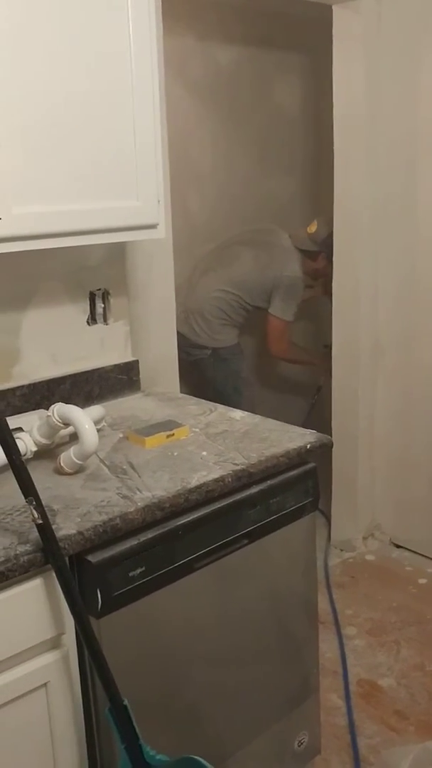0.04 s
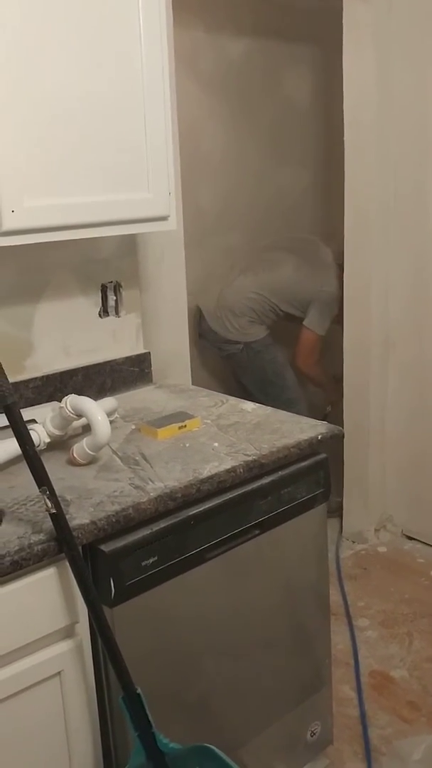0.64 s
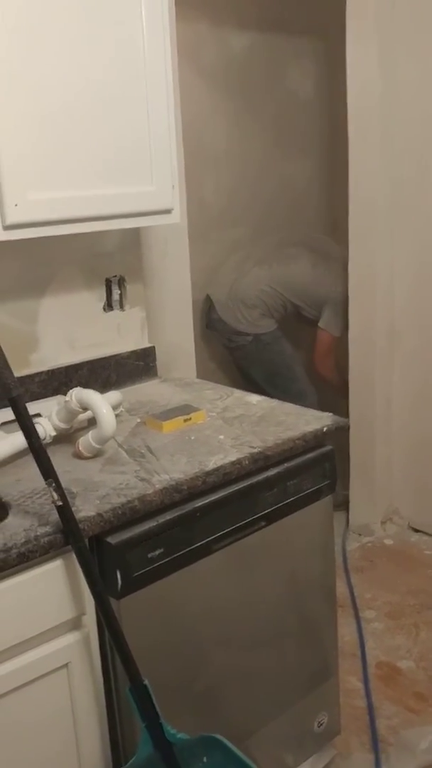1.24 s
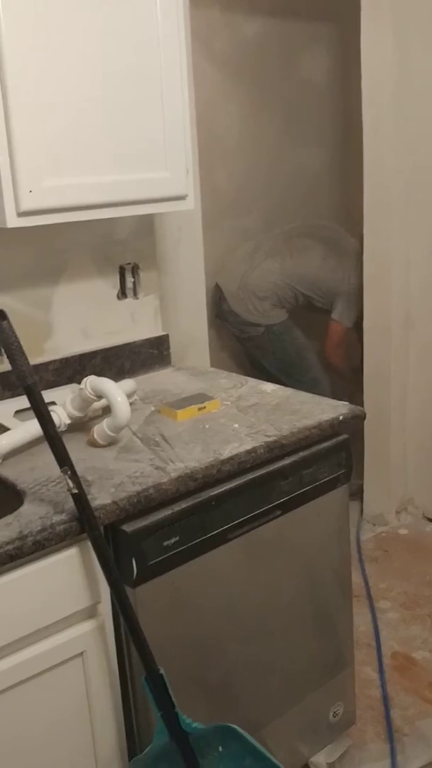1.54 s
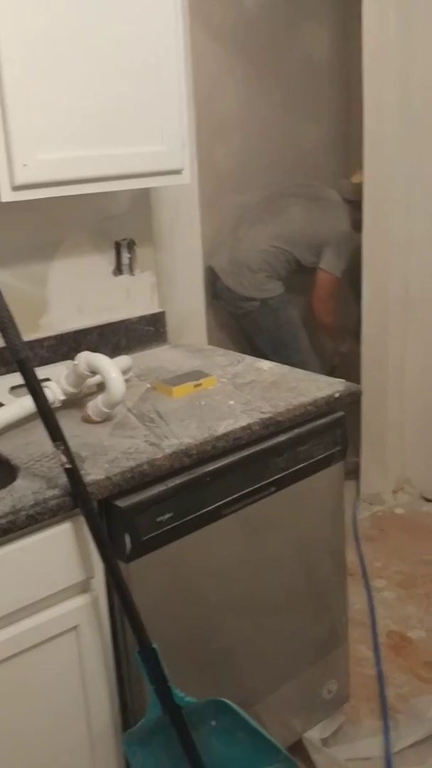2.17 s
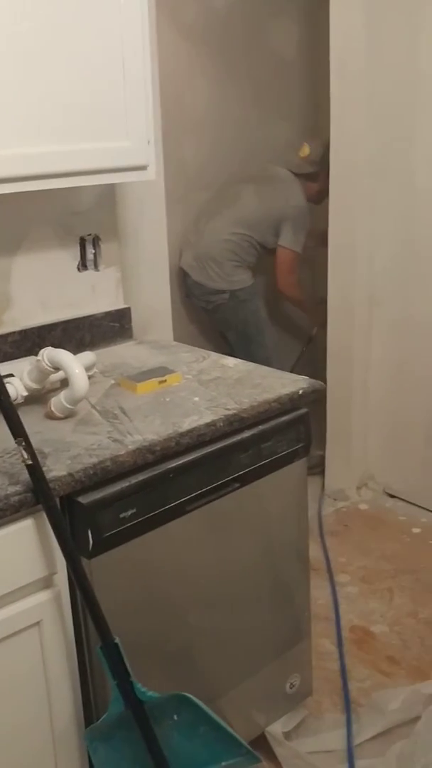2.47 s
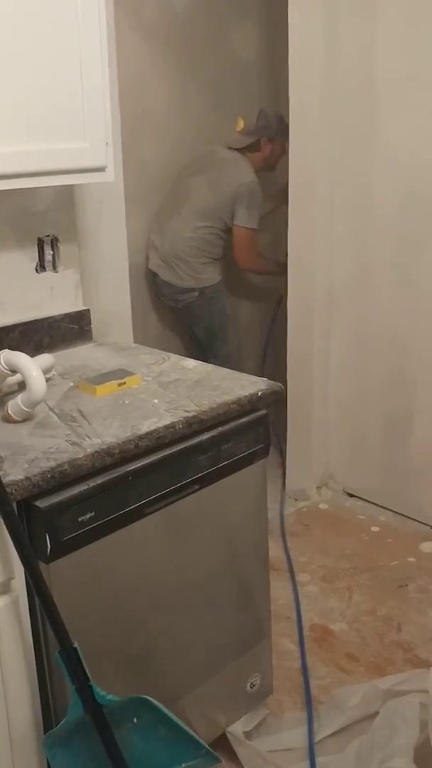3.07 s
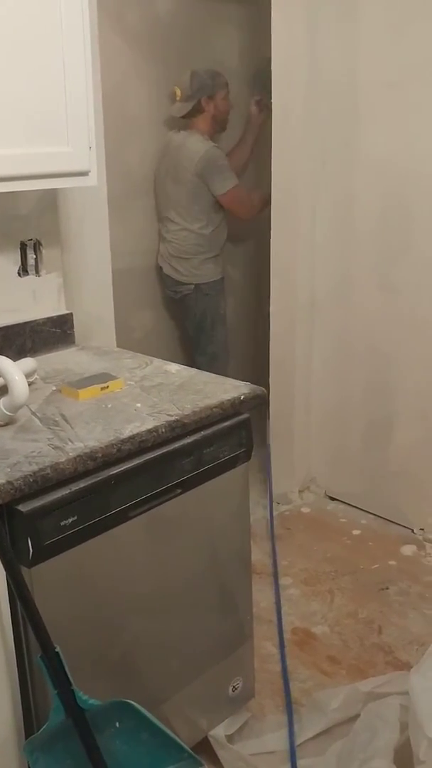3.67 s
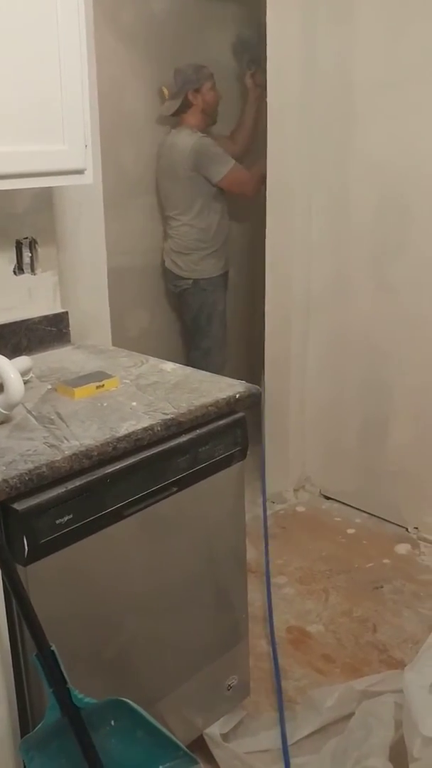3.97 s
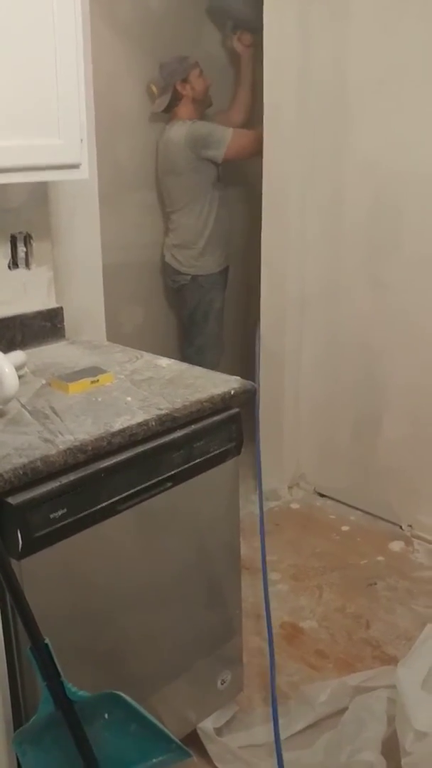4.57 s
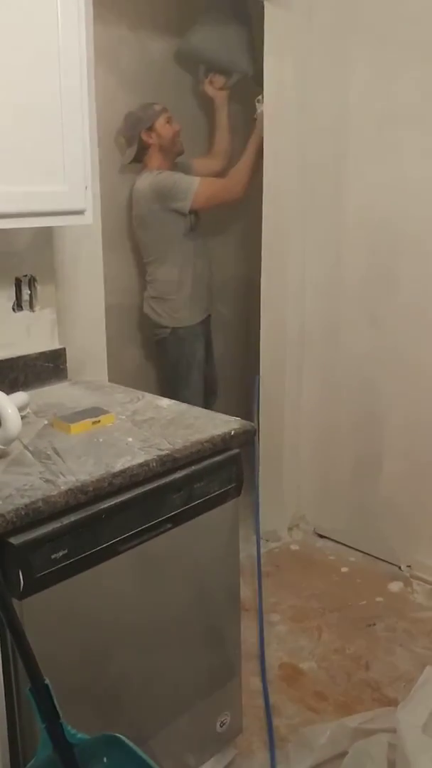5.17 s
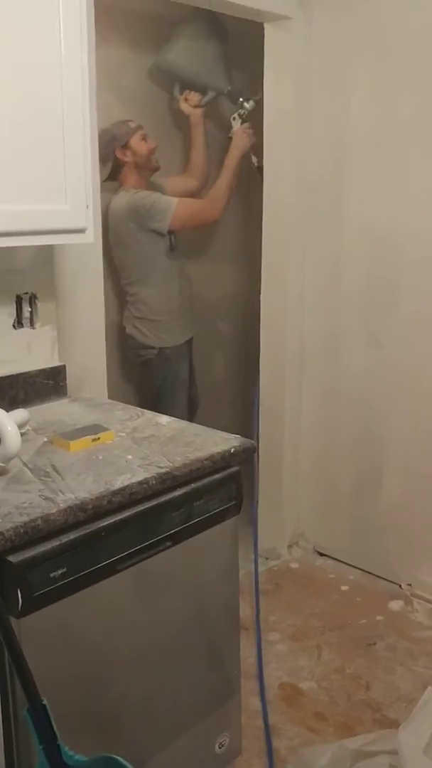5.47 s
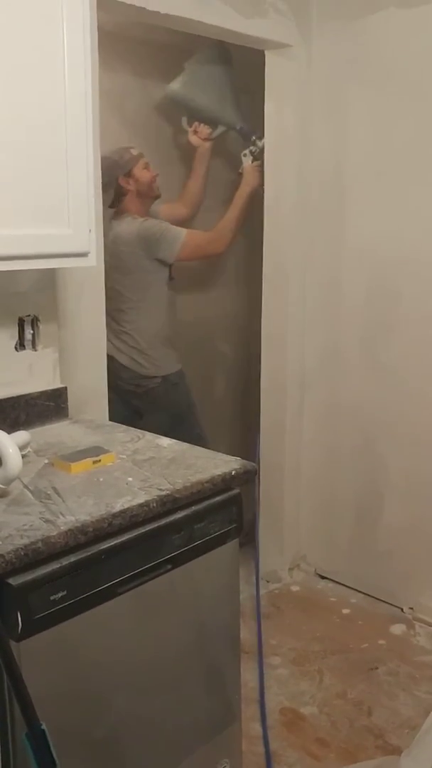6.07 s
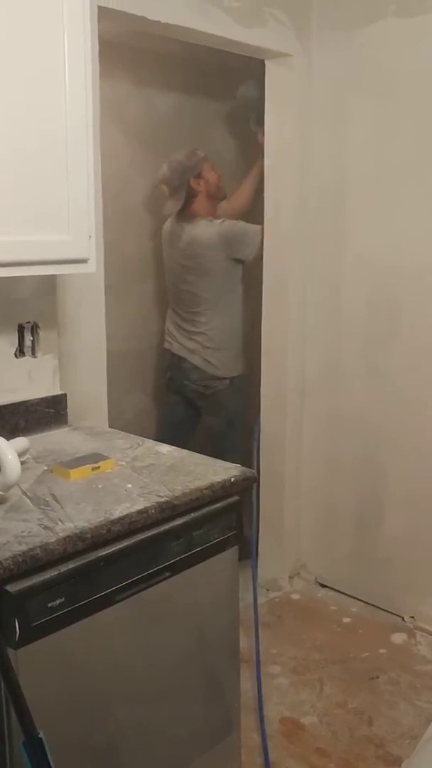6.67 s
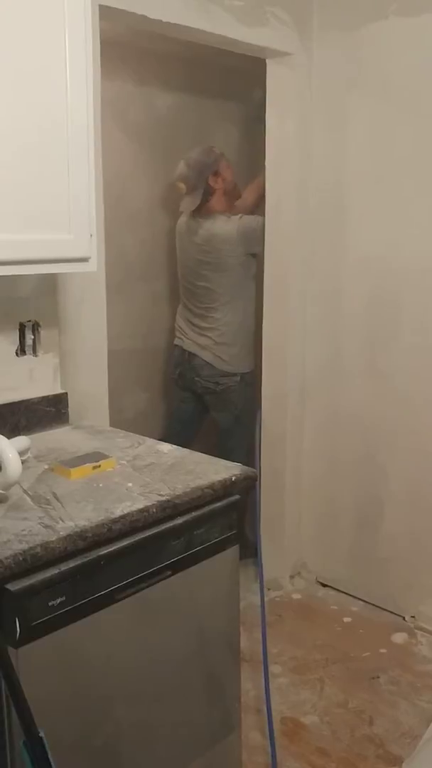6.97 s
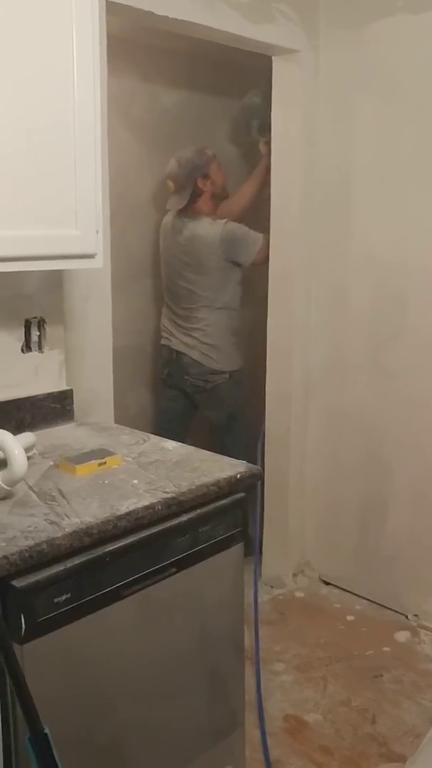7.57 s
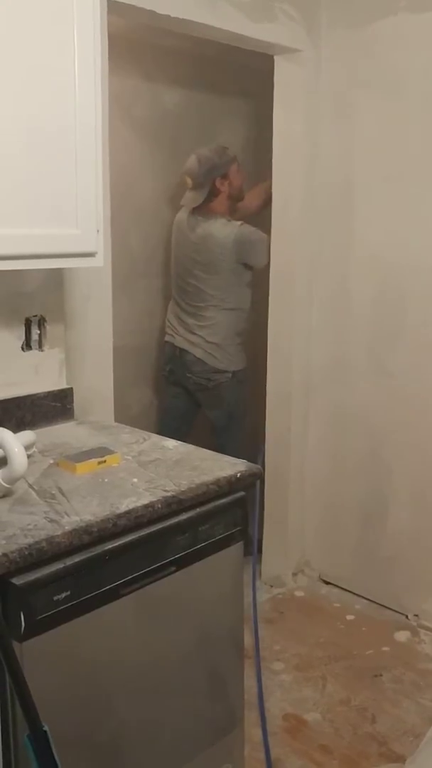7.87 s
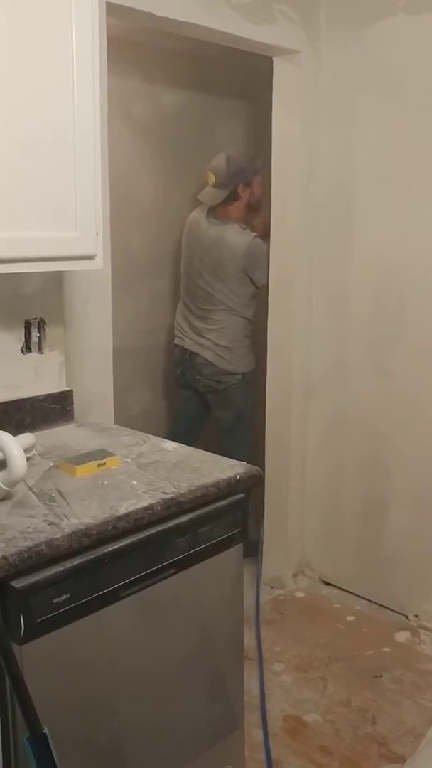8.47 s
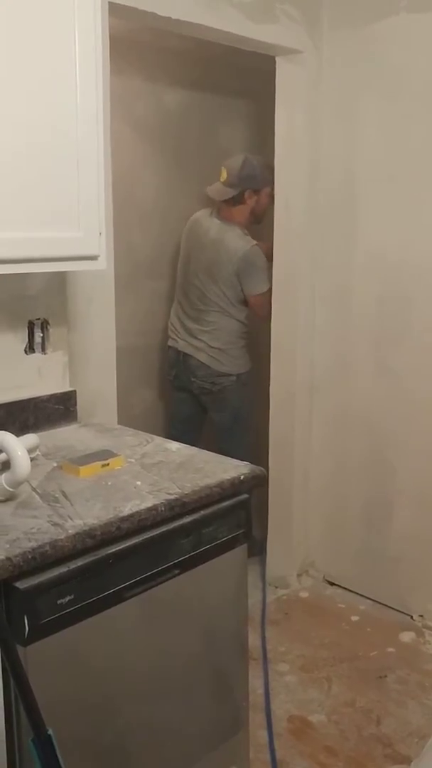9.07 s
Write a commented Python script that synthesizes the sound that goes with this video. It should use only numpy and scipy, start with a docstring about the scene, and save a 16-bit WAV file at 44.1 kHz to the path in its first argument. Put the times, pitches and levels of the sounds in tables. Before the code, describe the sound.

A hopper spray gun blows wall texture in a small bare room, and its loud compressed air hiss runs without a break for the whole nine seconds or so. The hiss is bright, wide and nearly constant in level, with a slightly wavering rush below it and a wet, swirling flicker in the treble. It overloads the microphone a little.

Underneath, air buffets the microphone, making a fluttering rumble and short, hollow low pops, almost all on the left. These come in irregular clumps from the start until about 4.8 seconds, ease briefly, then crowd together most strongly from 5.4 to 6.3 seconds. The sputter then drops back, with one hard pop near 6.6 seconds and a few scattered ones after it. From about 7.5 seconds the pops grow more frequent again, continuing under the unchanged hiss to the end.

```python
"""Hopper gun in a bare alcove

A hopper gun blows wall texture into a small bare alcove, its air jet hissing without a break.
The hiss arrives from all the walls at once, rings in two microphone ports and overloads the recorder.
Under the blast the microphones sputter with low pops, mostly the left one, and most of all while
the gun is in the open. A flicker in the treble gives the hiss a wet, swirling edge."""
import sys
import numpy as np
from scipy import signal
from scipy.fft import rfft, irfft, next_fast_len
from scipy.io import wavfile
from scipy.ndimage import uniform_filter1d

SR = 44100
rng = np.random.default_rng(int(sys.argv[2]) if len(sys.argv) > 2 else 0)


def transcribe(u):
    """Save the signal u as a 16-bit wav file named by the first command-line argument.

    u: samples, shape (n,) or (channels, n), limited to [-1, 1]; the rate is SR.
    q: integer samples, one column per channel.
    """
    v = np.clip(np.atleast_2d(u).T, -1, 1)
    q = np.round(v * 32767).astype(np.int16)
    wavfile.write(sys.argv[1], SR, q)


N = 411894

# The hardest kicks of air on the microphones.
# Each row: start in seconds, relative peak level in dB, microphone (0 left, 1 right).
LOUD_POPS = [(0.151, -8.5, 0), (0.17, -9.0, 0), (0.239, -10.0, 0), (0.287, -11.0, 0), (0.317, -9.5, 0),
             (0.325, -8.0, 0), (0.335, -11.0, 0), (0.373, -11.0, 0), (0.389, -5.0, 0), (0.393, -6.5, 0),
             (0.413, -8.5, 0), (0.429, -4.0, 0), (0.449, -11.0, 0), (0.462, -6.5, 0), (0.469, -9.5, 0),
             (0.59, -10.5, 0), (0.6, -4.5, 0), (0.62, -8.5, 0), (0.652, -11.5, 0), (0.659, -11.0, 0),
             (0.714, -6.0, 0), (0.723, -4.5, 0), (0.733, -8.0, 0), (0.759, -7.0, 0), (0.767, -6.0, 0),
             (0.779, -8.5, 0), (0.789, -10.5, 0), (0.83, -11.0, 0), (0.845, -9.5, 0), (0.854, -10.0, 0),
             (0.886, -5.0, 0), (0.891, -10.0, 0), (0.898, -11.5, 0), (0.926, -9.5, 0), (0.979, -3.5, 0),
             (0.998, -11.5, 0), (1.013, -11.5, 0), (1.059, -10.0, 0), (1.143, -6.5, 0), (1.192, -6.5, 0),
             (1.246, -7.0, 0), (1.261, -2.5, 0), (1.329, -10.0, 0), (1.346, -9.0, 0), (1.381, -11.0, 0),
             (1.396, -5.0, 0), (1.417, -7.0, 0), (1.499, -10.0, 0), (1.521, -4.5, 0), (1.587, -10.5, 0),
             (1.64, -3.5, 0), (1.656, -7.5, 0), (1.71, -10.0, 0), (1.777, -8.0, 0), (1.838, -10.0, 0),
             (1.869, -8.0, 0), (1.97, -11.0, 0), (2.026, -8.5, 0), (2.064, -10.0, 0), (2.086, -8.0, 0),
             (2.263, -11.0, 0), (2.281, -10.0, 0), (2.375, -6.5, 0), (2.438, -11.0, 0), (2.445, -9.0, 0),
             (2.459, -6.5, 0), (2.485, -9.5, 0), (2.547, -10.0, 0), (2.561, -9.0, 0), (2.577, -4.0, 0),
             (2.694, -6.5, 0), (2.798, -10.0, 0), (2.831, -7.0, 0), (2.98, -6.0, 0), (3.182, -8.5, 0),
             (3.189, -10.0, 0), (3.28, -9.5, 0), (3.378, -5.5, 0), (3.389, -11.5, 0), (3.452, -9.0, 0),
             (3.463, -7.0, 0), (3.471, -11.0, 0), (3.489, -5.5, 0), (3.532, -11.0, 0), (3.58, -5.0, 0),
             (3.651, -5.0, 0), (3.676, -10.5, 0), (3.74, -7.0, 0), (3.781, -9.0, 0), (3.815, -8.0, 0),
             (3.847, -4.5, 0), (3.875, -11.5, 0), (3.992, -6.5, 0), (3.999, -9.0, 0), (4.031, -9.0, 0),
             (4.04, -4.5, 0), (4.044, -9.5, 0), (4.051, -6.0, 0), (4.056, -10.5, 0), (4.175, -9.0, 0),
             (4.187, -5.5, 0), (4.204, -3.5, 0), (4.21, -7.0, 0), (4.267, -10.5, 0), (4.286, -6.5, 0),
             (4.304, -8.5, 0), (4.345, -10.0, 0), (4.365, -6.0, 0), (4.417, -7.0, 0), (4.498, -10.5, 0),
             (4.531, -11.5, 0), (4.536, -10.5, 0), (4.544, -11.5, 0), (4.608, -9.0, 0), (4.618, -9.0, 0),
             (4.679, -10.5, 0), (4.843, -3.0, 0), (4.929, -8.5, 0), (5.062, -11.5, 0), (5.219, -7.0, 0),
             (5.243, -11.5, 0), (5.279, -11.0, 0), (5.415, -9.5, 0), (5.426, -7.0, 0), (5.438, -9.0, 0),
             (5.445, -11.5, 0), (5.446, -12.0, 1), (5.454, -8.0, 0), (5.475, -10.0, 1), (5.477, -10.5, 0),
             (5.485, -10.5, 0), (5.492, -10.0, 0), (5.5, -12.0, 1), (5.503, -3.5, 0), (5.51, -4.0, 0),
             (5.549, -5.0, 0), (5.561, -5.0, 0), (5.572, -10.0, 0), (5.602, -10.0, 0), (5.607, -6.5, 0),
             (5.623, -9.5, 0), (5.634, -7.5, 0), (5.64, -4.5, 0), (5.647, -8.5, 0), (5.68, -10.5, 0),
             (5.687, -4.0, 0), (5.701, -3.5, 0), (5.705, -8.0, 0), (5.71, -10.0, 0), (5.718, -12.0, 1),
             (5.721, -10.5, 0), (5.729, -6.0, 0), (5.79, -6.5, 0), (5.795, -9.0, 0), (5.822, -6.0, 0),
             (5.835, -8.0, 0), (5.839, -9.0, 0), (5.855, -9.0, 0), (5.936, -10.0, 0), (5.947, -9.5, 0),
             (5.956, -4.5, 0), (5.976, -7.5, 0), (5.98, -11.5, 0), (6.075, -7.0, 0), (6.089, -3.0, 0),
             (6.149, -11.5, 0), (6.155, -6.0, 0), (6.171, -10.0, 0), (6.184, -9.5, 0), (6.238, -8.0, 0),
             (6.245, -6.0, 0), (6.627, -3.0, 0), (7.063, -10.0, 0), (7.239, -7.0, 0), (7.406, -11.0, 0),
             (7.503, -9.0, 0), (7.526, -9.5, 0), (7.697, -7.5, 0), (7.792, -11.5, 0), (7.817, -9.5, 0),
             (7.842, -7.5, 0), (7.933, -9.5, 0), (7.945, -11.5, 0), (7.963, -7.5, 0), (7.968, -9.0, 0),
             (7.984, -9.5, 0), (8.05, -10.0, 0), (8.086, -7.0, 0), (8.167, -8.0, 0), (8.173, -8.0, 0),
             (8.191, -10.0, 0), (8.203, -9.5, 0), (8.233, -10.0, 1), (8.233, -8.5, 0), (8.351, -11.5, 0),
             (8.355, -9.5, 0), (8.574, -10.0, 0), (8.608, -7.5, 0), (8.632, -9.0, 0), (8.637, -6.5, 0),
             (8.661, -10.0, 0), (8.728, -5.0, 0), (8.776, -6.5, 0), (8.801, -8.5, 0), (8.879, -9.5, 0),
             (8.895, -11.0, 0), (9.018, -9.0, 0), (9.106, -10.0, 0), (9.158, -9.5, 0)]


def from_db(db):
    """Decibels to gain."""
    return 10 ** (np.asarray(db) / 20)


def unit_rms(x):
    """Scale to an rms of one."""
    return x / np.sqrt(np.mean(x ** 2) + 1e-20)


def envelopes(rows):
    """Draw each column after the first (seconds) as a curve over every sample."""
    seconds, *columns = np.transpose(rows)
    return [np.interp(np.arange(N) / SR, seconds, column) for column in columns]


def drift(per_s):
    """Smooth random modulation with an rms of one and per_s turning points a second."""
    knots = rng.standard_normal(4000)
    return unit_rms(np.interp(np.arange(N) / SR * per_s, np.arange(len(knots)), knots))


def two_pole(x, hz, q, kind):
    """A resonant low-, band- or high-pass."""
    w = 2 * np.pi * hz
    numerator = {"low": [w * w], "band": [w / q, 0], "high": [1, 0, 0]}[kind]
    return signal.lfilter(*signal.bilinear(numerator, [1, w / q, w * w], SR), x + 1e-18)


def air_jet(port):
    """Turbulent hiss coloured by one port; the bare walls scatter it, so each port gets its own noise."""
    # The nearly steady blast. Each row: time in seconds, relative levels of hiss and lower rush in dB.
    jet_levels = [(0.15, -11, -9.5), (1.44, -11.5, -9.5), (5.0, -11.5, -10.5), (6.6, -12, -10.5),
                  (8.54, -11.5, -12), (9.3, -12, -10.5)]
    # The tone of the jet in the room. Each row: frequency in Hz, relative level in dB.
    jet_tone = [(20, -24), (55, -13), (150, -15.5), (350, -14.5), (800, -7.5), (1400, -13), (2200, -8),
                (3200, -4.5), (5000, 0.04), (7000, 4.5), (10000, 0), (16000, 0)]
    hiss_db, rush_db = envelopes(jet_levels)
    tone_hz, tone_db = np.transpose(jet_tone)
    size = next_fast_len(N, real=True)
    hz = np.arange(size // 2 + 1) * SR / size
    colour_db = np.interp(np.log(hz + 1), np.log(tone_hz), tone_db)
    for centre, width, db in port:
        colour_db += db / (1 + (2 * (hz - centre) / width) ** 2)
    spectrum = rfft(rng.standard_normal(size)) * from_db(colour_db)
    hiss = irfft(spectrum, size)[:N]
    # The lower rush wavers and the top flutters slightly, each on its own.
    rush_band = np.exp(-np.log2((hz + 1) / 2930) ** 2)  # an octave either side of 2930 Hz
    top_band = np.clip((hz - 8000) / 3000, 0, 1)
    rush = irfft(spectrum * rush_band, size)[:N]
    top = irfft(spectrum * top_band, size)[:N]
    waver = from_db(rush_db - np.mean(rush_db) + 1.6 * np.tanh(drift(per_s=22)))
    flutter = from_db(0.5 * drift(per_s=45))
    return from_db(hiss_db) * (hiss + (waver - 1) * rush + (flutter - 1) * top) / np.std(hiss)


def microphone_pop(kicks, tuning=1):
    """A kick of air gives a short rounded spike, a hollow ring and a slow swing through the bass cut."""
    spike = two_pole(kicks, hz=895 * tuning, q=0.99, kind="low")
    spike = two_pole(spike, hz=1800, q=0.53, kind="low")
    hollow = two_pole(spike, hz=549 * tuning, q=6.0, kind="band")
    thump = two_pole(spike, hz=82.6, q=0.73, kind="band")
    pop = two_pole(spike + 1.76 * hollow + 2.0 * thump, hz=54.5, q=1.95, kind="high")
    return two_pole(pop, hz=27, q=1.0, kind="high")


def sputter_strength():
    """How hard the blast buffets the microphones, with a brief flurry around each loud pop."""
    # The sputter as the gun moves about; it is in the open from 5.4 to 6.3 seconds.
    # Each row: time in seconds, relative level in dB.
    buffeting = [(0, -23), (0.45, -26), (0.8, -24.5), (1.07, -32.5), (1.45, -23.5), (2.05, -26.5),
                 (2.6, -26.5), (3.1, -30.5), (3.45, -28), (4.05, -24.5), (4.55, -25.5), (4.75, -26.5),
                 (5.05, -34), (5.37, -30), (5.46, -22.5), (5.8, -25), (6.03, -26.5), (6.23, -24.5),
                 (6.33, -36.5), (6.9, -33.5), (7.55, -31), (7.97, -30.5), (8.47, -30), (8.78, -29),
                 (9.0, -27), (9.3, -32)]
    level_db, = envelopes(buffeting)
    flurry_db, flurry_half_s = -23.5, 0.015
    peaks = np.zeros(N)
    for start, db, _ in LOUD_POPS:
        peaks[int(start * SR)] += from_db(db + flurry_db)
    flurries = signal.fftconvolve(peaks, np.bartlett(2 * int(flurry_half_s * SR) + 1), "same")
    return np.hypot(from_db(level_db), flurries)


def sputter(strength, per_s, spread_db):
    """Small kicks of uneven size come in loose clumps and merge into a fluttering rumble."""
    clumps = from_db(2.5 * np.tanh(2 * drift(per_s=30)))
    density = (strength / np.mean(strength)) ** 0.6  # harder sputter is also denser
    hits = rng.random(N) < per_s * density * clumps / SR
    sizes = clumps / np.sqrt(density) * from_db(spread_db * rng.uniform(-1.5, 1, N))
    kicks = hits * sizes * rng.choice([-1, 1], N)
    return microphone_pop(strength * kicks) / np.std(microphone_pop(kicks))


def loud_pops():
    """Single hard kicks on either microphone, most pushing inward; some sound duller, some brighter."""
    # Pitch factors for a dull, a middling and a bright pop.
    tunings = [.88, 1, 1.12]
    inward_share, boost_db = 0.65, 2.4
    kicks = np.zeros((len(tunings), 2, N))
    for start, db, side in LOUD_POPS:
        sign = 1 if rng.random() < inward_share else -1
        colour = int(rng.random() * len(tunings))
        kicks[colour, int(side), int(start * SR)] += sign * from_db(db + boost_db)
    unit_peak = microphone_pop(signal.unit_impulse(SR // 10)).max()
    return sum(microphone_pop(track, tuning) for track, tuning in zip(kicks, tunings)) / unit_peak


def fast_gain_control(x):
    """Takes back a share of every swing above or below its working level, in each channel on its own."""
    working_db, share, window_s = -6, 0.3, 0.0015
    power = uniform_filter1d(x ** 2, int(window_s * SR), axis=-1)
    level_db = 10 * np.log10(np.maximum(power, 1e-6))
    return x * from_db(-share * (level_db - working_db))


def treble_flicker(x):
    """Narrow bands of the treble dip and return at random, alike in both ears: a wet, swirling edge."""
    # Where the hiss flickers most. Each row: centre in Hz, half width in Hz, added depth scale in dB.
    zones = [(4000, 1370, 31), (9050, 300, 18)]
    base_depth_db, above_hz = 2.5, 1500
    dip_half_hz, dip_half_s = 31, 0.02
    framing = dict(nperseg=2048, noverlap=1536)
    hz, seconds, bands = signal.stft(x, SR, **framing)
    # Noise blurred across pitch and time sets where the dips fall.
    steps = np.arange(-12, 13)
    pitch_blur = np.exp(-(steps * hz[1] / dip_half_hz) ** 2)
    time_blur = np.exp(-(steps * seconds[1] / dip_half_s) ** 2)
    noise = rng.standard_normal(bands.shape[1:])
    blotches = unit_rms(signal.fftconvolve(noise, np.outer(pitch_blur, time_blur), "same"))
    dips = np.logaddexp(0, 2 * blotches) / 2  # softly keep the positive half
    zones_db = sum(db / (1 + ((hz - centre) / width) ** 2) ** 2 for centre, width, db in zones)
    depth_db = (base_depth_db + zones_db) * (hz > above_hz)
    gain = from_db(-depth_db[:, None] * dips)
    gain /= np.sqrt(np.mean(gain ** 2, axis=1, keepdims=True))  # each band keeps its average power
    return signal.istft(bands * gain, SR, **framing)[1][:, :N]


def scene():
    """Bright hiss in both ports, with the sputter and pops below it and mostly on the left."""
    # Resonances and notches of each microphone port. Each row: centre in Hz, width in Hz, gain in dB.
    left_port = [(560, 220, 7.5), (7430, 4290, -6), (9045, 890, -9.1), (10385, 3130, 12)]
    right_port = [(570, 260, 3.5), (7640, 1220, 9.7), (8975, 815, -7.6), (14900, 6060, -2.6)]
    hiss = from_db(7.5) * np.array([air_jet(left_port), from_db(-0.84) * air_jet(right_port)])
    strength = sputter_strength()
    left_sputter = from_db(2.5) * sputter(strength, per_s=420, spread_db=4.5)
    right_sputter = from_db(-18.5) * sputter(strength, per_s=90, spread_db=8.0)
    return hiss + np.array([left_sputter, right_sputter]) + loud_pops()


def record(dry):
    """The level is evened, the overloaded input rounds the peaks; the treble flickers, its top is cut."""
    ceiling, cutoff_hz = 1.29, 15720
    overloaded = ceiling * np.tanh(fast_gain_control(dry) / ceiling)
    high_cut = signal.ellip(12, 0.05, 60, cutoff_hz, fs=SR, output="sos")
    return signal.sosfiltfilt(high_cut, treble_flicker(overloaded))


dry = scene()
out = record(dry)
transcribe(out)
```